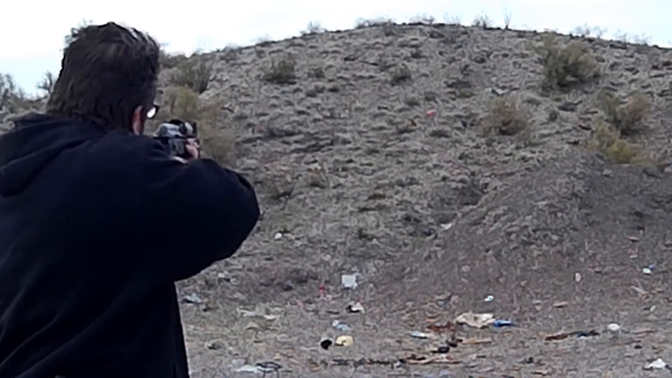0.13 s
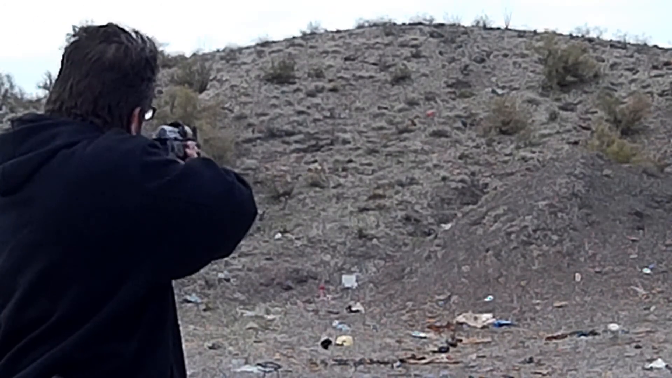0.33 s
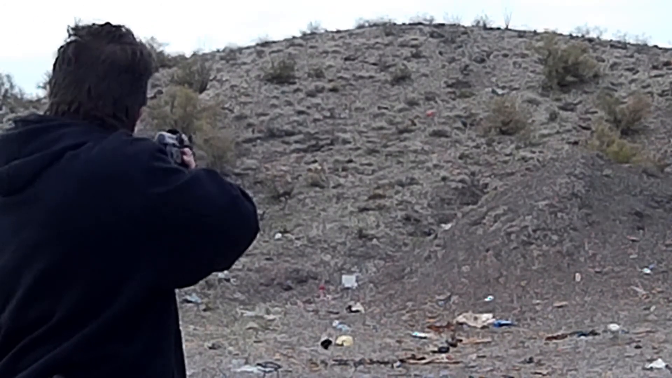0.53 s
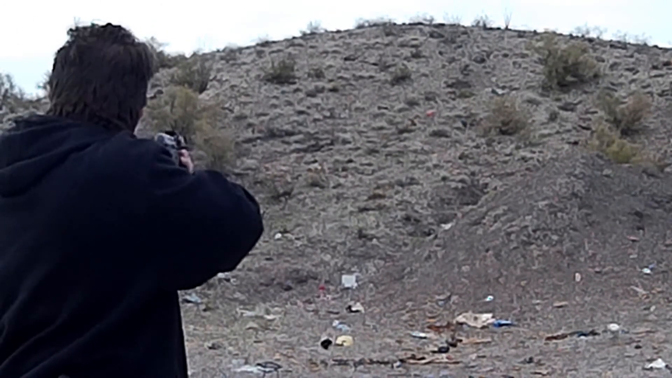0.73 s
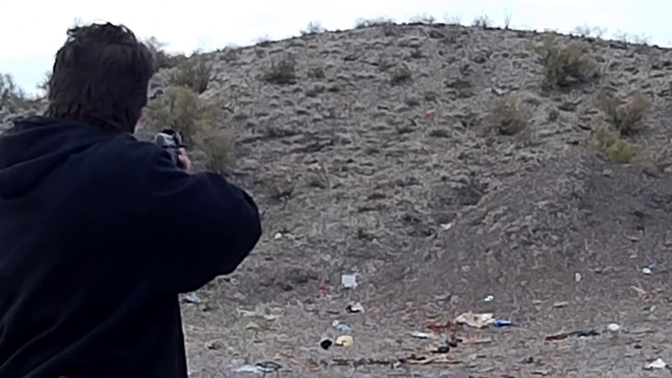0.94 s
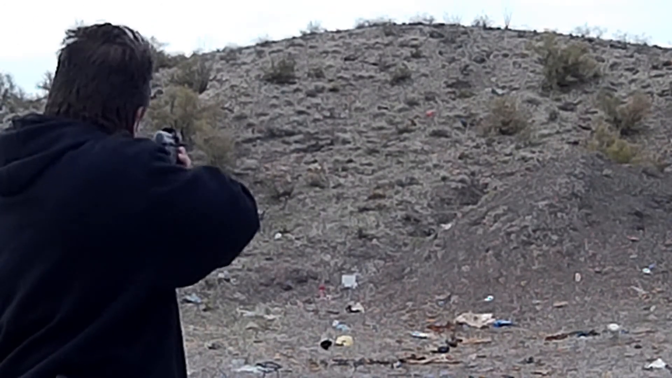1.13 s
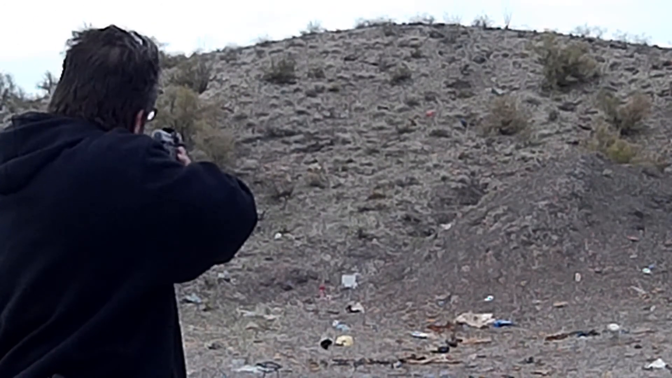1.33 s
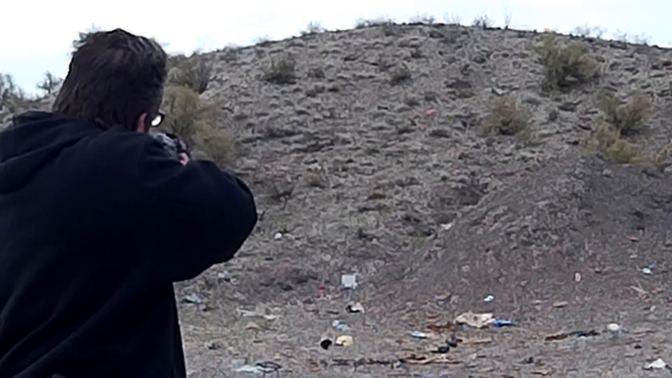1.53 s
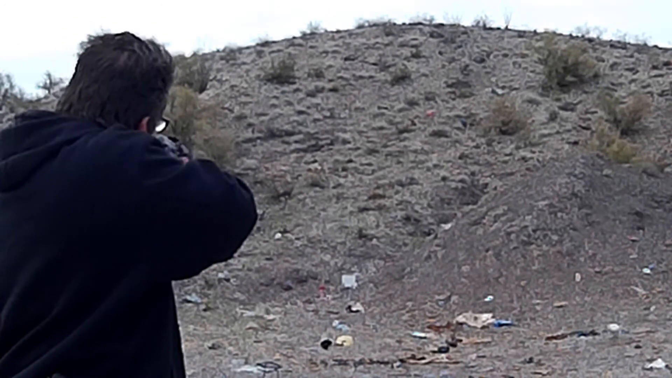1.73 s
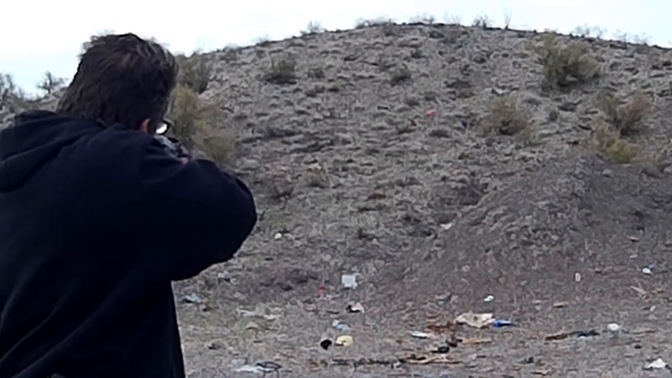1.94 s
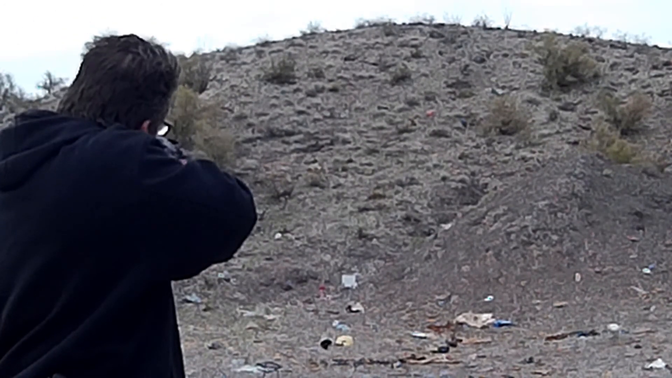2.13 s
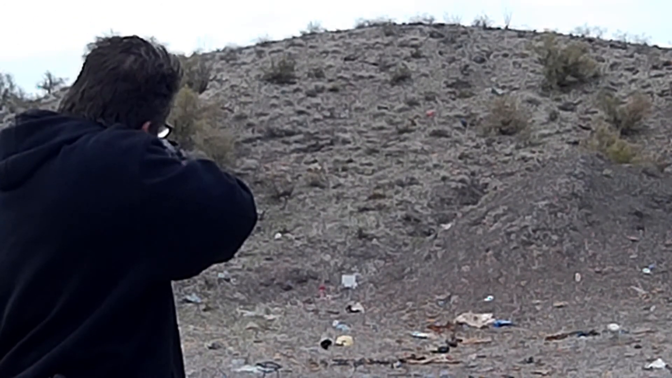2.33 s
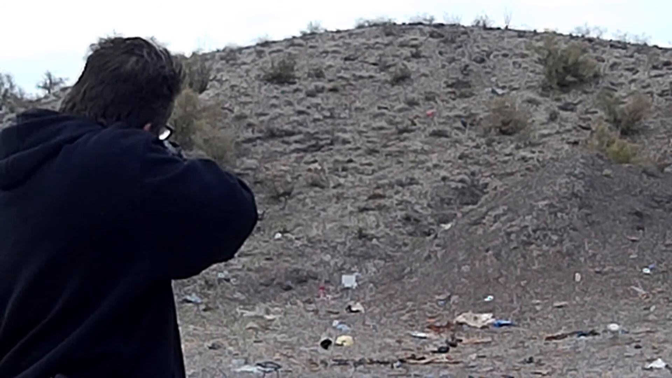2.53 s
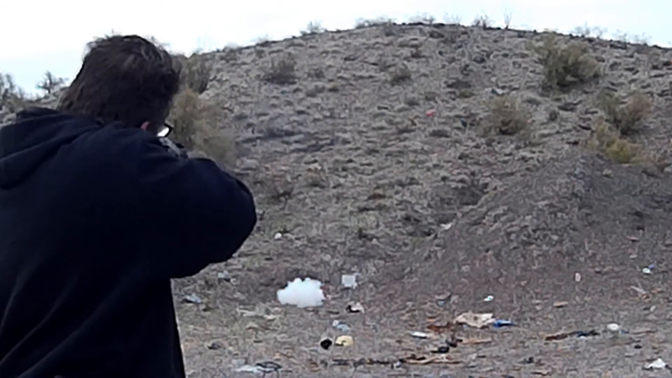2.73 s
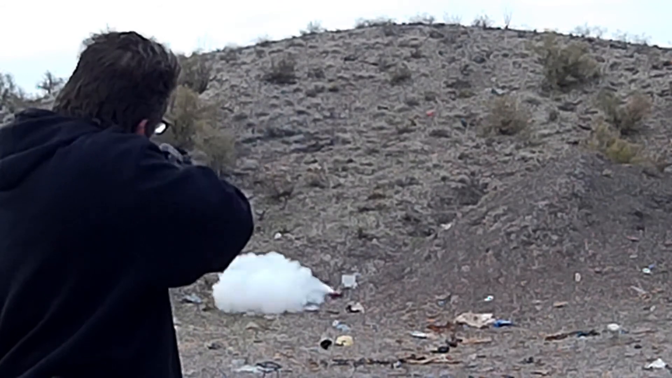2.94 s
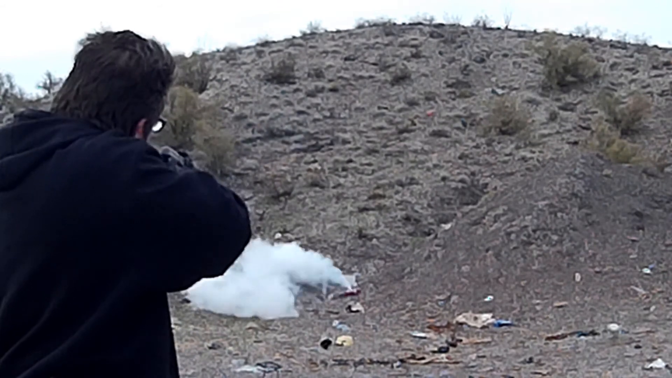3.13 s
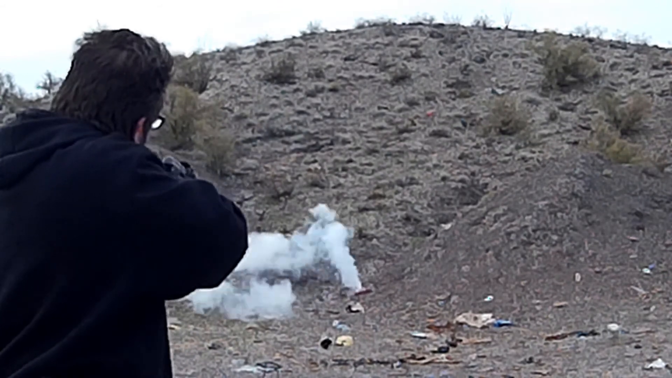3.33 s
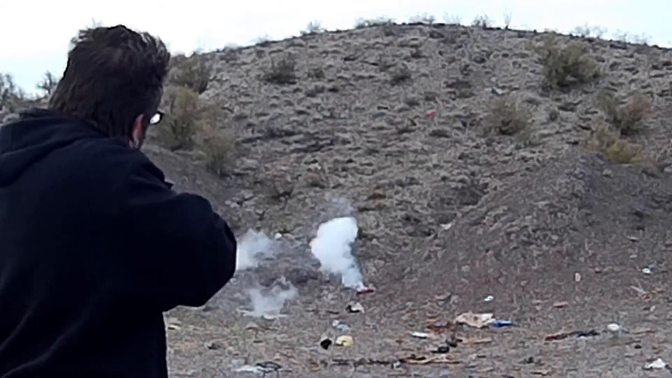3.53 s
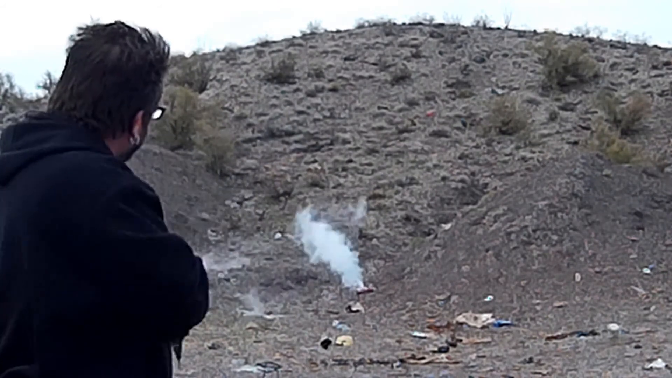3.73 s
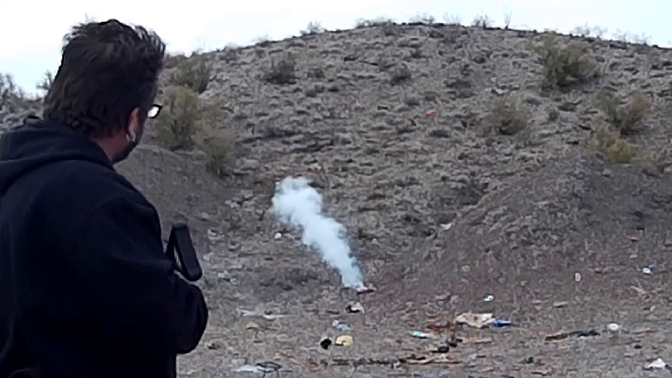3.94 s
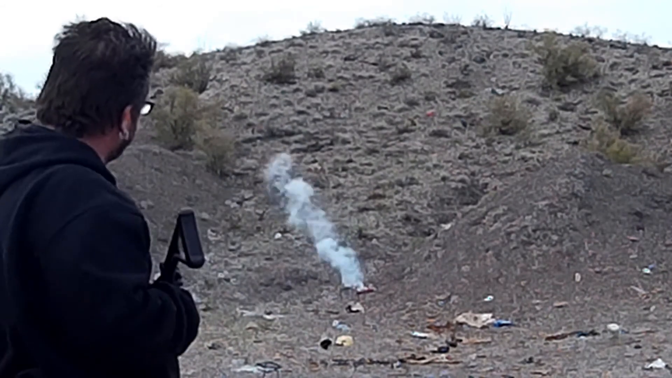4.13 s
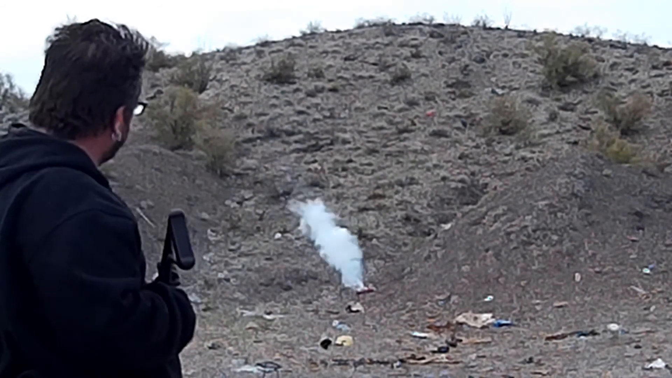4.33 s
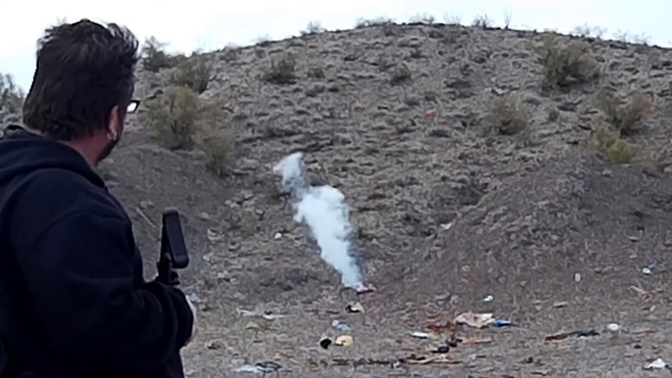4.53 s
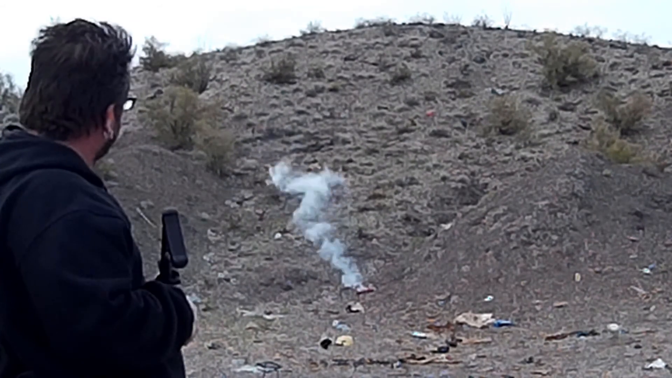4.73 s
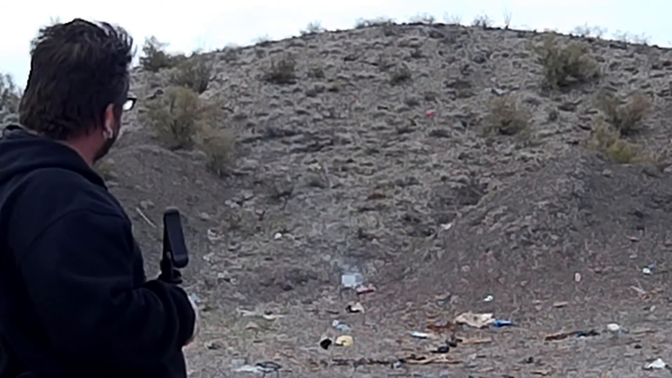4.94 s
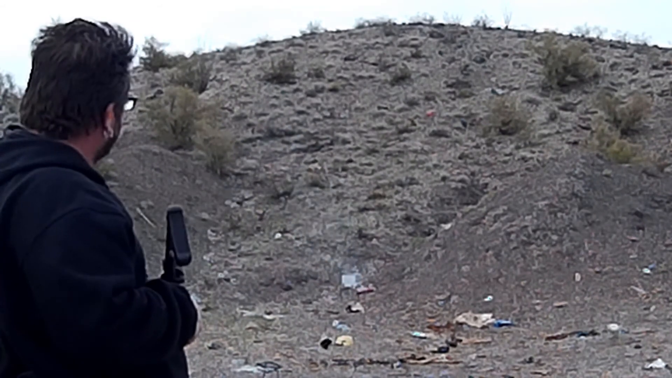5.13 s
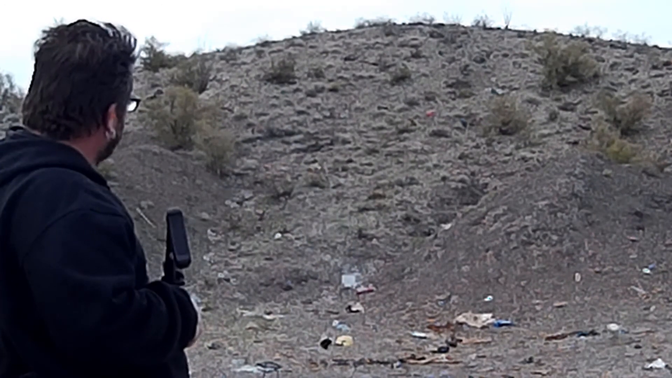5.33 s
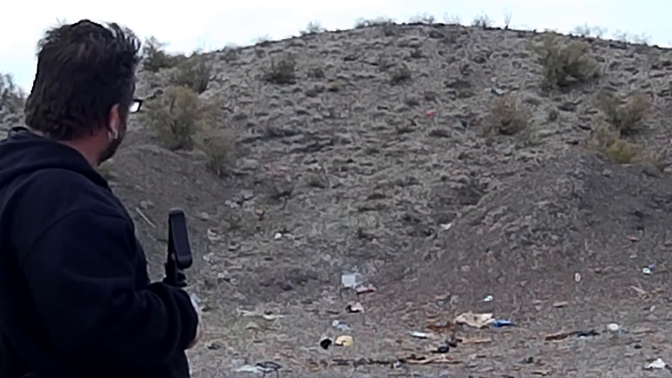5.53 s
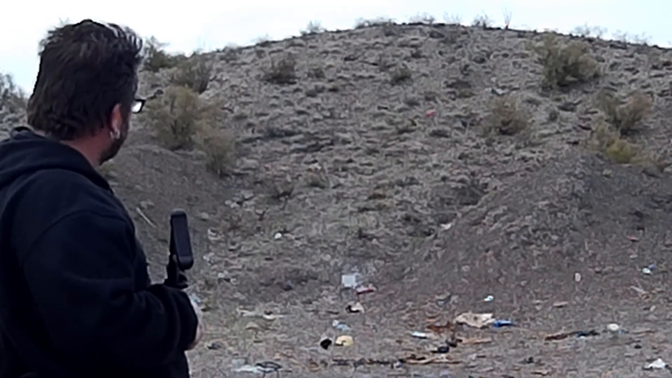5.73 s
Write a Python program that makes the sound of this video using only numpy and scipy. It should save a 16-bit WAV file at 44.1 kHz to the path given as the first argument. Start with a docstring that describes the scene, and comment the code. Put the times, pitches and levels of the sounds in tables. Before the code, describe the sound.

Outdoors on a quiet desert range, a sharp rifle crack echoes off a hill, followed by small gear clicks and another crack. A much bigger close shot holes a fire extinguisher; it gushes with a low powdery roar, then jets a bright, fluctuating hiss. More shots snap over it. The single microphone clips, ducks after the loud blasts and picks up soft wind buffeting.

```python
"""Rifles fire on an open desert range: pressure swings, a crack and a puff of gas, then a long soft hill echo.
A close shot holes a fire extinguisher, which gushes low-roaring powder and then hisses on as it rolls;
the hiss is noise passed through bands that change with the can's position.
Small clicks, wind on the microphone and a faint hiss with a thin whine lie behind.
The recorder turns quiet passages down, ducks after loud shots and clips them."""
import sys
import numpy as np
from scipy import signal
from scipy.fft import rfft, irfft, next_fast_len
from scipy.io import wavfile
from scipy.ndimage import map_coordinates

SR = 44100
rng = np.random.default_rng(int(sys.argv[2]) if len(sys.argv) > 2 else 0)


def bounce(signal):
    """Save signal as a 16-bit WAV file at the path given by the first command-line argument."""
    frames = np.transpose(np.atleast_2d(signal))
    limited = np.clip(frames, -1, 1)
    pcm = np.round(limited * 32767).astype(np.int16)
    wavfile.write(sys.argv[1], SR, pcm)


N = 254898  # length of the scene in samples

# tone colour of sound scattered by the hillside and ground: (frequency [Hz], level [dB])
HILL_COLOUR = [(40, -36), (150, -13), (300, -13), (500, -6.5), (830, -1.5), (1300, -3.5), (2200, -11),
               (2900, -9), (3900, -26.5), (5300, -22), (7500, -36.5), (15000, -52)]
NEAR_SHOT_S = 2.6688
BURST_S, POWDER_OUT_S = 2.69, 4.9  # the can is holed; its powder runs out


def amp(db):
    """Turn decibels into a plain multiplier."""
    return 10 ** (np.asarray(db) / 20)


def unit(x):
    """Scale a signal to an rms of 1."""
    return x / np.sqrt(np.mean(x ** 2) + 1e-20)


def clock():
    """The time of every sample, in seconds."""
    return np.arange(N) / SR


def along(points, hz):
    """Read a curve of (Hz, value) points on a log frequency axis."""
    f, v = np.transpose(points)
    return np.interp(np.log(hz + 1), np.log(f + 1), v)


def curves(rows):
    """One value per sample for each column after the time."""
    s, *cols = np.transpose(rows)
    return [np.interp(clock(), s, c) for c in cols]


def wobble(rate):
    """A smooth random curve through `rate` random points a second."""
    points = rng.standard_normal(int(N * rate / SR) + 4)
    return map_coordinates(points, [clock() * rate])


def patches(shape, across, lasting):
    """A smooth random field of rms 1 over frequency bins and time frames."""
    bins, frames = shape
    points = rng.standard_normal((int(bins / across) + 4, int(frames / lasting) + 4))
    grid = np.meshgrid(np.arange(bins) / across, np.arange(frames) / lasting, indexing="ij")
    return unit(map_coordinates(points, grid))


def filtered(x, response):
    """Multiply the spectrum of x by a response that depends on frequency."""
    m = next_fast_len(len(x) + 8192)
    spectrum = rfft(x, m) * response(np.fft.rfftfreq(m, 1 / SR))
    return irfft(spectrum, m)[:len(x)]


def noise(spectrum, size):
    """Noise of rms 1 with a (Hz, dB) colour."""
    return unit(filtered(rng.standard_normal(size), lambda hz: amp(along(spectrum, hz))))


def wandering_band(centre_hz, width_hz):
    """Noise in a band that follows centre_hz: two slow noises carried on a cosine and a sine."""
    lowpass = lambda hz: 1 / (1 + (hz / width_hz) ** 2)
    a, b = [unit(filtered(rng.standard_normal(N), lowpass)) for _ in range(2)]
    turn = 2 * np.pi * np.cumsum(centre_hz) / SR
    return a * np.cos(turn) + b * np.sin(turn)


def swell(s, half_length):
    """A smooth rise to 1 at time s, and the fall after it."""
    return np.exp(-((clock() - s) / half_length) ** 2)


def lagged(x, lag_s):
    """Follow x with a time lag."""
    pole = np.exp(-1 / (lag_s * SR))
    return signal.lfilter([1 - pole], [1, -pole], x)


def add(track, s, sound):
    """Lay a sound into the track at time s."""
    part = track[round(s * SR):][:len(sound)]
    part += sound[:len(part)]


def line_shots(crack_t60=0.013, gas_t60=0.017, scatter_db=-22, scatter_t60=0.12):
    """Each report is a few pressure swings, a crack and a puff of gas, then scatter from ground and hill."""
    # rifles along the firing line: (time [s], level [dB], ring [Hz], ring length [s],
    # then, relative to the shot: crack [dB], gas [dB], echo [dB])
    shots = [(0.1816, -6.5, 930, 0.0028, -18, -38, -36), (2.1543, -6, 986, 0.0025, -12.5, -46, -37),
             (2.8601, 0.5, 1240, 0.00086, -16, -2, -27.5), (2.949, 0.5, 1400, 0.0013, -12, -15.5, -44),
             (3.5576, 7, 1005, 0.00225, -15.5, -29, -35), (4.9, 7.5, 930, 0.0023, -11, -39, -31)]
    # colour of the sharp crack: (frequency [Hz], level [dB])
    crack_colour = [(60, -30), (150, -2), (350, -11), (900, -10), (1700, 0), (3000, 5), (4200, 0),
                    (5500, 0.5), (8000, -6), (10000, -36)]
    # colour of the puff of muzzle gas: (frequency [Hz], level [dB])
    gas_colour = [(50, -28), (150, -8.5), (300, 2), (600, -7.5), (1400, -3), (2000, 1), (2700, -11.5),
                  (5000, -24), (9000, -16), (15000, -24.5)]
    out, t = np.zeros(N), np.arange(SR // 5) / SR
    for s, db, ring_hz, length, crack_db, gas_db, echo_db in shots:
        onset = 1 - np.exp(-t / .00009)
        swings = np.sin(2 * np.pi * ring_hz * t + np.pi / 4) * np.exp(-(t / length) ** 3) * onset
        crack = noise(crack_colour, size=len(t)) * amp(crack_db - 60 * t / crack_t60)
        gas = noise(gas_colour, size=len(t)) * amp(gas_db - 60 * t / gas_t60)
        scatter = noise(HILL_COLOUR, size=len(t)) * amp(scatter_db - 60 * t / scatter_t60)
        add(out, s, amp(db) * (swings + crack + gas + scatter))
        add(out, s, amp(db + echo_db) * hill_echo())
    return out


def near_shot(boom_db=12.5, boom_hz=330, boom_s=0.003, blast_db=11, blast_t60=0.13, echo_db=-20.5):
    """The close shot: one low pressure swing, turbulent muzzle gas, and the hill's answer."""
    # colour of the close muzzle blast: (frequency [Hz], level [dB])
    blast_colour = [(40, -7), (150, -49), (330, -8), (600, -3), (850, -7), (1250, -3), (2000, 4.5),
                    (2600, -8), (4000, -8), (8000, -19.5), (12000, -17.5), (15500, -30)]
    out, t = np.zeros(N), np.arange(SR // 2) / SR
    boom = np.sin(2 * np.pi * boom_hz * t) * amp(boom_db) * np.exp(-(t / boom_s) ** 2)
    gas = noise(blast_colour, size=len(t)) * amp(blast_db - 60 * t / blast_t60)
    add(out, NEAR_SHOT_S, boom + gas)
    add(out, NEAR_SHOT_S, amp(echo_db) * hill_echo())
    return out


def hill_echo(patchy_db=2.0):
    """Uneven scatter from rocks and bushes swells as each slope answers; the middle pitches ring longest."""
    # how long the echo takes to fall 60 dB, the swells aside: (frequency [Hz], time [s])
    decay = [(150, 0.62), (900, 1.21), (3000, 1.23), (8000, .8)]
    # slopes that answer a shot: (delay [s], spread [s], swell [dB])
    slopes = [(.11, 0.046, 4), (.3, .09, 5.5), (.73, 0.12, 18.5)]
    hz, t, z = signal.stft(noise(HILL_COLOUR, size=2 * SR), SR, nperseg=256)
    answers = sum(db * np.exp(-((t - delay) / spread) ** 2) for delay, spread, db in slopes)
    scatter = patchy_db * patches(z.shape, across=7, lasting=6)
    dying = 60 * t / along(decay, hz)[:, None]
    return signal.istft(z * amp(answers + scatter - dying), SR, nperseg=256)[1]


def vented():
    """0 while the can is whole, rising quickly to 1 once it is holed."""
    return np.clip((clock() - BURST_S) / 0.0067, 0, 1)


def jet(eddy_db=0.66, sway_db=1.1, flutter_db=0.59, pivot_hz=3500):
    """Gas tears out of the hole: its flow and treble vary, and its colour changes as the can rolls."""
    # bands in which the jet sings, for three positions of the rolling can:
    # (centre [Hz], half width [Hz], level [dB])
    sideways = [(1175, 300, -4), (1603, 450, -1.5), (3180, 600, -4.5), (4010, 670, -7.5), (5150, 400, -5),
                (6670, 310, -2.5), (7370, 510, -6), (8470, 460, -5.5), (9600, 430, -12), (11600, 980, -8.5),
                (14200, 690, -21)]
    upward = [(1186, 223, -1.5), (1608, 290, 1.5), (2910, 530, -3), (3850, 370, -5), (5170, 360, -2.5),
              (6590, 320, -3), (7660, 930, -4), (9150, 450, -5.5), (11230, 740, -6), (12040, 480, -6.5),
              (14050, 1200, -16.5)]
    settled = [(1320, 170, -2), (1860, 440, 0.0), (3320, 270, 2), (4440, 710, -8), (5480, 420, -5.5),
               (6360, 390, -6), (7310, 320, 1.5), (8680, 470, -10), (10960, 380, -23), (11920, 750, -26),
               (14300, 570, -17.2)]
    # how the can rolls: (time [s], position [0 sideways, 1 upward, 2 settled])
    roll = [(3.5, 0.082), (3.95, 1), (4.85, 1), (5.15, 1.27), (5.6, 1.61)]
    # a steady hollow and a slight bump in the hiss: (centre [Hz], half width [Hz], change [dB])
    dents = [(5970, 170, -5.5), (9940, 270, 1)]
    flow_db, tilt_db = jet_flow()
    position, = curves(roll)
    hiss = np.zeros(N)
    for k, bands in enumerate([sideways, upward, settled]):
        share = np.clip(1 - abs(position - k), 0, 1)
        hiss += np.sqrt(share) * jet_voice(bands)
    hz, t, z = signal.stft(hiss, SR, nperseg=512)
    octaves = np.log2(np.maximum(hz, pivot_hz / 4) / pivot_hz)[:, None]
    tilt = octaves * np.interp(t, clock(), tilt_db)
    dent = sum(db * np.exp(-((hz - centre) / width) ** 2) for centre, width, db in dents)[:, None]
    eddies = eddy_db * patches(z.shape, across=7, lasting=8)
    # the plume sways, so its bands slowly trade strength
    sway = sway_db * patches(z.shape, across=5, lasting=36)
    hiss = signal.istft(z * amp(tilt + dent + eddies + sway), SR, nperseg=512)[1][:N]
    return hiss * amp(flow_db + flutter_db * wobble(45))


def jet_flow(jet_db=-17.5, sag_db_per_s=2.5):
    """Flow in dB and treble tilt in dB per octave: choked by powder, then freed, sagging at the end."""
    # brightness of the swaying jet: (time [s], treble tilt [dB per octave])
    brightness = [(2.92, 2.3), (3.06, -2), (3.45, -0.87), (3.85, -2), (4.25, 0.43), (4.55, -0.74),
                  (4.85, -1), (5.13, -1.1), (5.3, 1), (5.5, -0.4)]
    # the choking powder gives way in steps:
    # (time [s], time taken [s], flow gained [dB], treble gained [dB per octave])
    clearings = [(2.85, .012, 1.5, 6), (3.21, 0.038, 6.5, 0.7), (4, 0.29, 0.5, .3)]
    # the pressure falls once the powder has run out
    flow_db = jet_db - sag_db_per_s * np.maximum(clock() - POWDER_OUT_S, 0)
    tilt_db, = curves(brightness)
    for s, taken, gain_db, treble_db in clearings:
        choked = (1 - np.tanh((clock() - s) / (2 * taken))) / 2  # 1 before the step, 0 after
        flow_db = flow_db - gain_db * choked
        tilt_db = tilt_db - treble_db * choked
    return flow_db, tilt_db


def jet_voice(bands, low_hz=830):
    """Turbulence heard through the bands of one position of the can."""
    def response(hz):
        power = sum(amp(db) ** 2 / (1 + ((hz - centre) / width) ** 2) ** 2 for centre, width, db in bands)
        return np.sqrt(power / (1 + (low_hz / (hz + 1)) ** 4))
    return unit(filtered(rng.standard_normal(N), response))


def gush(dense_db=-31, dense_hz=505, hold_s=.47, thin_db=-48.5, thin_hz=379.6, fade_db_per_s=46,
         roar_hz=190, lumps_db=1.5, low_hz=230):
    """Dense powder roars low, holds, then sinks to a thin trickle that fades once the powder is out."""
    fade = lambda s: amp(-fade_db_per_s * np.maximum(clock() - s, 0))
    dense = fade(BURST_S + hold_s)
    roar = wandering_band(thin_hz + (dense_hz - thin_hz) * dense, roar_hz)
    roar = filtered(roar, lambda hz: 1 / np.sqrt(1 + (low_hz / (hz + 1)) ** 4))
    strength = amp(dense_db) * dense + amp(thin_db) * fade(POWDER_OUT_S)
    return roar * strength * amp(lumps_db * wobble(30))


def moans(waver_hz=22, rough_db=6.0):
    """The hole briefly moans: a tone that wavers in pitch and roughly in level."""
    # (time [s], half length [s], middle pitch [Hz], level [dB])
    moan_times = [(3.114, .033, 575, -29.5), (3.213, .012, 503, -24.5)]
    out = np.zeros(N)
    for s, half_length, hz, db in moan_times:
        turn = 2 * np.pi * np.cumsum(hz + waver_hz * wobble(90)) / SR
        tone = np.sin(turn) * amp(rough_db * wobble(70))
        out += amp(db) * swell(s, half_length) * unit(tone)
    return out


def ticks(level_db=-3.0, t60=0.082):
    """Small dry clicks of gear and grit: short bursts of noise that die away."""
    # (time [s], level before the shared level_db is added [dB])
    clicks = [(0.633, -42), (1.111, -49.5), (1.358, -58), (1.415, -50), (1.468, -52), (1.575, -49),
              (2.071, -47.5)]
    # colour of a click: (frequency [Hz], level [dB])
    click_colour = [(300, 4), (1500, 8.5), (3000, 1), (6000, -8), (15000, -19)]
    out, t = np.zeros(N), np.arange(SR // 8) / SR
    for s, db in clicks:
        add(out, s, noise(click_colour, size=len(t)) * amp(db + level_db - 60 * t / t60))
    return out


def wind(gust_db=-52, lumps_db=1.26):
    """Light air only rumbles on the microphone; stronger gusts flap higher up."""
    # the breeze on the microphone: (time [s], level [dB])
    breeze = [(0, -54), (1.2, -60), (2.05, -61.5), (2.9, -53), (3.4, -61), (4.15, -49.5), (5.78, -51.5)]
    # gusts: (time [s], half length [s], level [dB])
    gusts = [(0.684, 0.052, -47), (4.42, 0.21, -46.5), (4.803, 0.039, -39), (5.01, 0.047, -36.5),
             (5.143, 0.089, -34.5), (5.492, 0.055, -47), (5.745, 0.033, -35.5)]
    # colours of light air and of strong gusts: (frequency [Hz], level [dB])
    calm_colour = [(10, -11.5), (30, -3), (70, -0.5), (140, -4), (250, -11.5), (500, -28), (1200, -20.5),
                   (4000, -50)]
    gust_colour = [(20, -13.5), (60, -8), (160, 3), (330, 0), (600, -7), (1200, -12), (4000, -28.5),
                   (12000, -69)]
    breeze_db, = curves(breeze)
    strength = amp(breeze_db) + sum(amp(db) * swell(s, half_length) for s, half_length, db in gusts)
    strong = 1 / (1 + (amp(gust_db) / strength) ** 2)  # 0 in light air, towards 1 in gusts
    rumble = np.sqrt(1 - strong) * noise(calm_colour, size=N)
    flapping = np.sqrt(strong) * noise(gust_colour, size=N)
    return (rumble + flapping) * strength * amp(lumps_db * wobble(28))


def air(air_db=-62.5, hiss_db=1, whine_db=-10, whine_hz=9555):
    """Faint steady hiss with a thin, slightly unsteady whine in it."""
    # colour of the hiss: (frequency [Hz], level [dB])
    air_colour = [(100, 4.5), (500, 11), (1200, 6), (3000, 2.5), (8000, -0.5), (13000, -0.5), (15500, -4)]
    whine = np.sin(2 * np.pi * whine_hz * clock() + 1.3 * wobble(120))
    return amp(air_db) * (amp(hiss_db) * noise(air_colour, size=N) + amp(whine_db) * whine)


def scene():
    """Shots and the venting can over the quiet range, heard at one point."""
    can = vented() * (jet() + gush() + moans())
    mono = line_shots() + near_shot() + can + ticks() + wind() + air()
    return np.array([mono, mono])


def suppressor(x, depth_db=7, shut_db=-57.0, span_db=11, lag_s=.025):
    """Quiet passages are turned down, so the hiss swells behind each louder sound."""
    level_db = 10 * np.log10(lagged(x ** 2, lag_s) + 1e-12)
    opened = lagged(np.clip((level_db - shut_db) / span_db, 0, 1), lag_s)
    return x * amp(depth_db * (opened - 1))


def gain_control(x, threshold_db=0, release_s=0.11, attack_s=0.014):
    """Peaks over the threshold pull the gain down; it comes back fast at first, then slowly."""
    over = np.maximum(20 * np.log10(abs(x) + 1e-9) - threshold_db, 0)
    fade = np.exp(-clock() / release_s)
    held = np.maximum.accumulate(over / fade) * fade  # each peak dies away unless a bigger one takes over
    return x * amp(-lagged(held, attack_s))


def record(dry, ceiling=.93, top_hz=15700):
    """One microphone: noise suppressor, gain control, clipping near full scale, and the band limit."""
    x = gain_control(suppressor(dry[0]))
    x = x / (1 + abs(x / ceiling) ** 16) ** (1 / 16)
    x = filtered(x, lambda hz: 1 / (1 + (hz / top_hz) ** 120))
    return np.array([x, x])


dry = scene()
out = record(dry)
bounce(out)
```